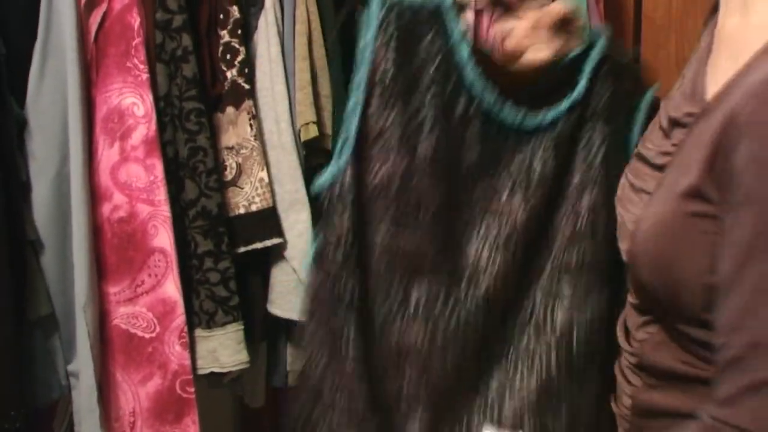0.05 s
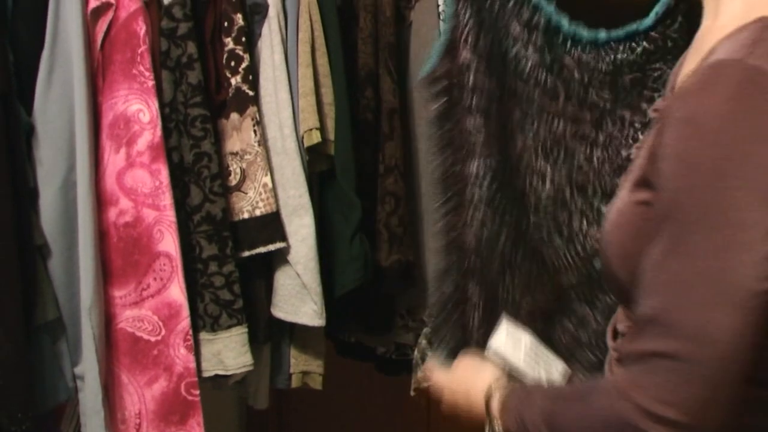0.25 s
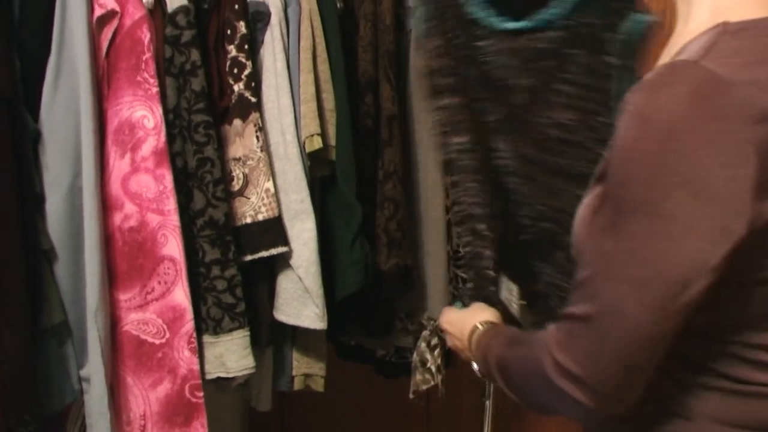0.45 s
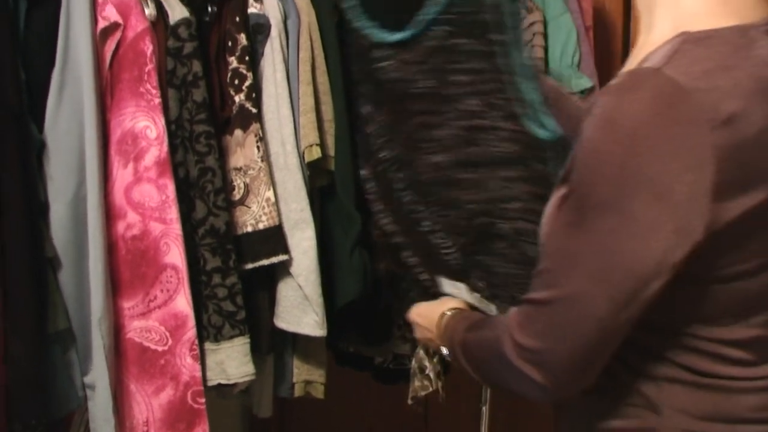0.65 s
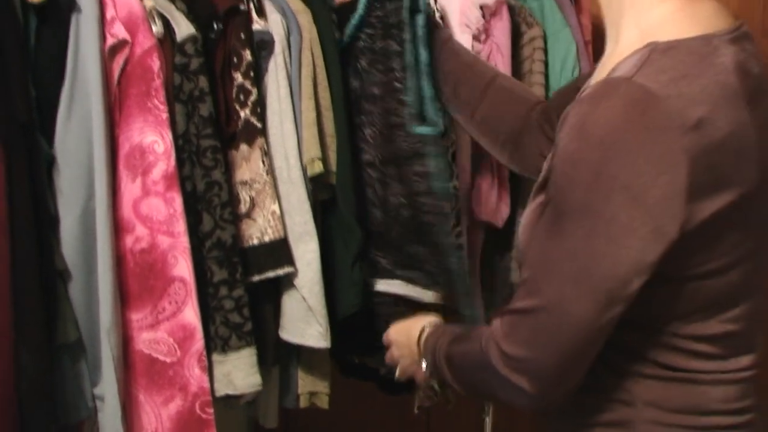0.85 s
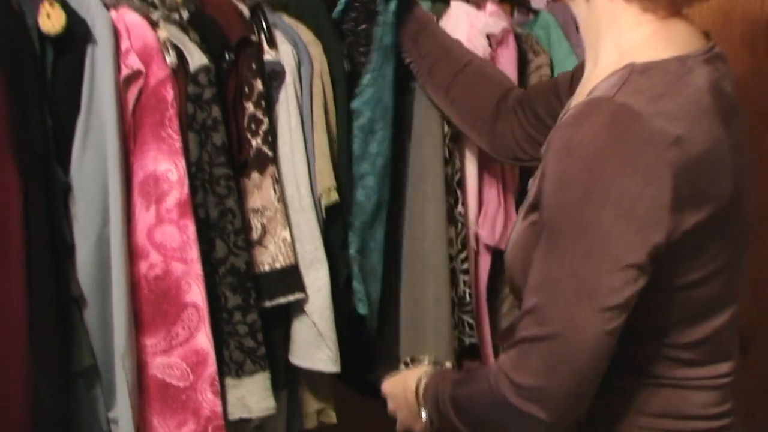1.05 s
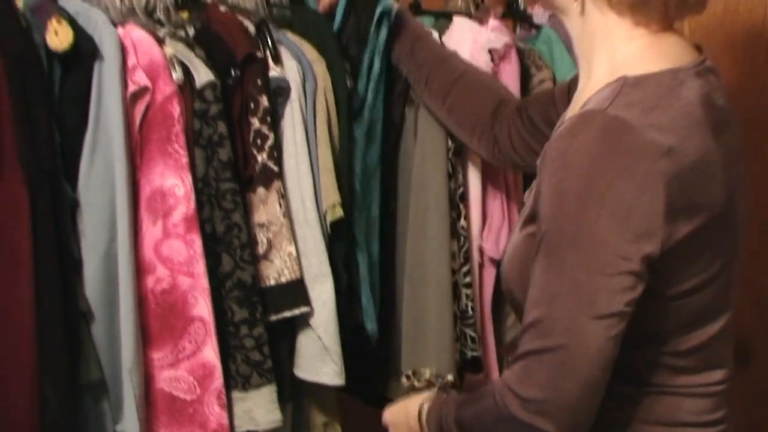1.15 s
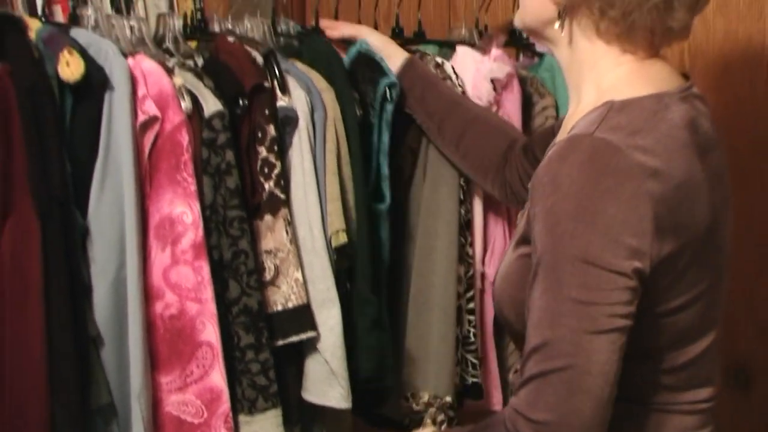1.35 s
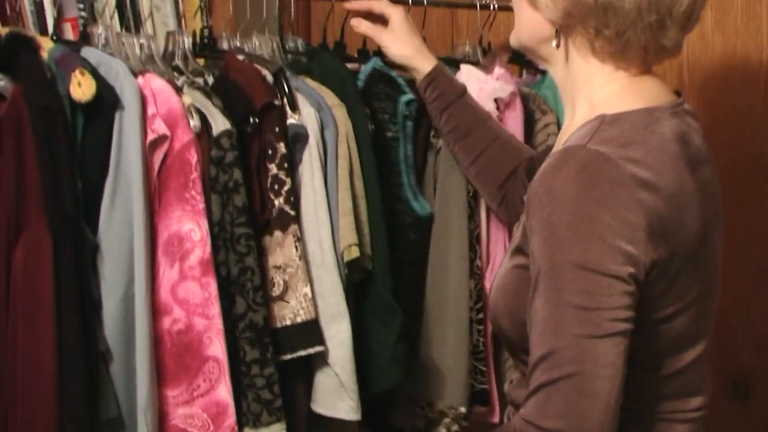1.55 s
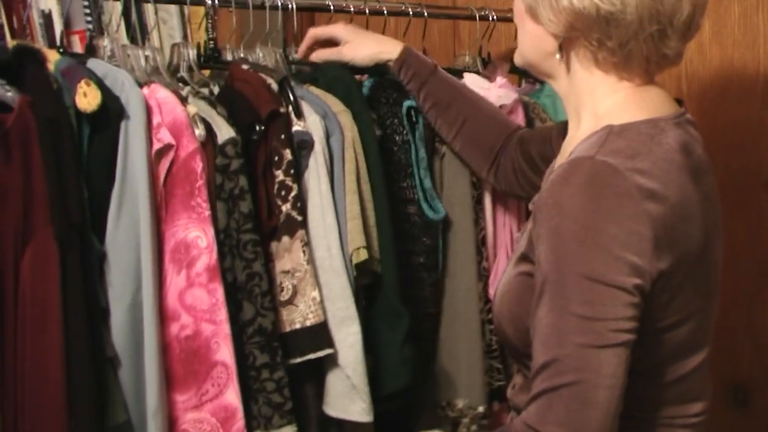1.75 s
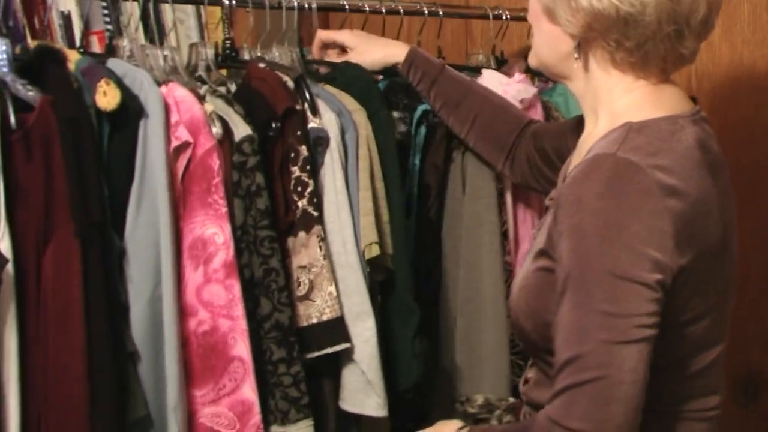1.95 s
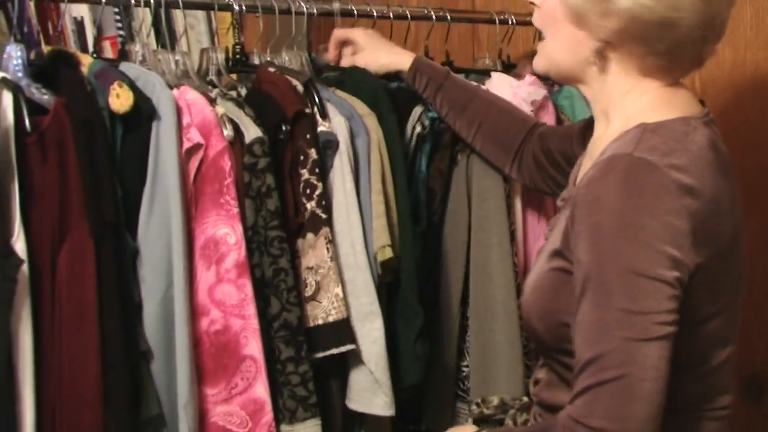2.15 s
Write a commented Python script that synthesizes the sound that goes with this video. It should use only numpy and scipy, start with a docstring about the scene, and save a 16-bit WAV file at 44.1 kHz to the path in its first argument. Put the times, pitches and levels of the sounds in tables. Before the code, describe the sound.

A wire hanger hook clacks sharply onto a metal rail, then a neighbouring hanger clinks

```python
"""A wire-hooked hanger is hung on the metal rail of a crowded clothes rack in a small panelled room:
the hook strikes the rail, a neighbour clinks (noise cracks plus bunches of decaying sines), and the
rack hums briefly (low modes that swell). A soft thud, small plastic taps and dry ticks (shaped noise
puffs), cloth rustle and the room's hiss (patchy stereo noise) complete the scene."""
import sys
import numpy as np
from scipy import signal
from scipy.fft import rfft, irfft, next_fast_len
from scipy.io import wavfile
from scipy.ndimage import uniform_filter1d

SR = 44100
rng = np.random.default_rng(int(sys.argv[2]) if len(sys.argv) > 2 else 0)


def volts_from_decibels(level):
    """Turn decibel levels (scalar or array-like) into linear amplitude factors."""
    exponent = np.asarray(level, float) / 20
    return 10 ** exponent


def generate_wav(sig):
    """Save sig (samples, or channels by samples) to the path in sys.argv[1] as 16-bit PCM at SR."""
    pcm = np.round(np.clip(np.atleast_2d(sig).T, -1, 1) * 32767).astype(np.int16)
    wavfile.write(sys.argv[1], SR, pcm)


N = 97372

# hiss spectrum: f/Hz, relative density/dB
HISS_SPECTRUM = [(35, -41), (60, -10), (107, -9.5), (188, -8), (260, -4.5), (329, -6), (488, -6.5),
                 (815, -3), (959, -7.5), (1800, -4.5), (2020, -10.5), (2870, -8.5), (3370, -11),
                 (5010, -13), (15700, -21)]
# cloth rustle envelope: t/s, rms level/dB
RUSTLE_ENVELOPE = [(0, -90), (0.031, -58), (.09, -56.5), (.15, -71.5), (.33, -77), (.42, -61.5), (.5, -67),
                   (.62, -82), (.84, -73), (.87, -67.5), (.93, -64), (.97, -70), (1.04, -67), (1.15, -82),
                   (1.6, -93), (1.7, -70.5), (1.88, -63.5)]
# cloth spectrum: f/Hz, relative density/dB
CLOTH_SPECTRUM = [(150, -120), (300, 3.5), (800, -4.5), (2000, 1), (5000, -13.5), (10000, -10.5),
                  (16000, -21), (17000, -120)]
# likeness of the noise in left and right: f/Hz, correlation/1
NOISE_LIKENESS = [(60, 0.46), (180, -0.31), (550, -0.17), (1650, 0.017), (4970, 0.1), (15000, 0.11)]
# plastic taps: t/s, dry peak level/dB, centre f/Hz, width/Hz, t60/s
PLASTIC_TAPS = [(0.174, -53, 5000, 5900, 0.012), (0.8517, -45.5, 9000, 12000, 0.0023),
                (.896, -46, 6700, 12300, 0.026), (.896, -59, 805, 300, 0.014),
                (1.654, -44, 7700, 9000, 0.048), (1.657, -57.5, 2100, 381, 0.018),
                (1.7279, -39.5, 3640, 1210, 0.034), (1.739, -51, 1510, 533, 0.044),
                (1.798, -56.5, 7600, 900, 0.045), (1.798, -47.5, 3480, 2500, 0.2),
                (1.8466, -39.5, 8300, 12900, 0.018)]
# thud spectrum: f/Hz, relative density/dB
THUD_SPECTRUM = [(60, -40), (130, -9), (230, -1), (450, -3), (700, 0), (1200, -4), (2000, -7), (2900, -7),
                 (3800, -19), (12000, -27), (16000, -40)]
# dry ticks close by: t/s, dry peak level/dB, centre f/Hz, width/Hz
DRY_TICKS = [(.2385, -35, 1300, 4000), (.5367, -39, 3300, 4500), (.5408, -39, 3300, 3500),
             (1.2327, -15, 6000, 9000), (1.2455, -17, 5000, 8000), (1.7355, -38, 6000, 12000)]
# hook on rail, with its rattles: t/s, crack peak level before the wire's high-pass/dB
HOOK_CONTACTS = [(1.2303, -21), (1.2328, -18.5), (1.2372, -18), (1.2455, -24.5)]
# hook wire modes: f/Hz, relative level/dB, t60/s
HOOK_MODES = [(2100, -31, 0.15), (2716, -18, 0.076), (3650, -27, .05), (4130, -8, 0.25),
              (4740, -6.5, 0.062), (5220, -4, .06), (6780, 0.5, 0.045), (7240, -11.5, 0.32),
              (7560, -30, .08), (9600, -27, 0.04), (12400, -18, 0.072), (12400, 0, 0.041), (12500, -9, .06),
              (15700, -2, .05)]
# hook crack spectrum: f/Hz, relative density/dB
HOOK_CRACK_SPECTRUM = [(180, -81), (300, -26), (627, 4.5), (1130, -20.5), (3030, 0), (3590, 3.5),
                       (13000, 5.5), (15700, -21), (16500, -34)]
# rack frame modes: f/Hz, level/dB, t60/s
RACK_MODES = [(182.5, -52.5, 0.13), (430.5, -44, 0.18), (670, -54, 0.042), (760, -31.5, 0.077),
              (1160, -65, 0.04)]
# neighbouring hanger's contacts: t/s, crack peak level before the wire's high-pass/dB
CLINK_CONTACTS = [(1.3506, -22), (1.3533, -22.5), (1.366, -30)]
# neighbour's modes: f/Hz, relative level/dB, t60/s
NEIGHBOUR_MODES = [(730, -22, 0.12), (2225, -21.5, 0.096), (2886, -2.5, 0.035), (3560, -8.5, 0.14),
                   (4250, -5.5, 0.24), (5123, -10.5, 0.23), (6220, -6.5, .1), (7430, -9.5, 0.14),
                   (9065, -11.5, 0.16), (9970, -11, 0.061), (11880, 5, 0.083), (13700, -5, 0.078),
                   (13700, -28, .03), (15400, -11, 0.046)]
# clink crack spectrum: f/Hz, relative density/dB
CLINK_CRACK_SPECTRUM = [(300, -40), (550, -36), (700, -30), (1600, -29), (2700, -7), (4240, 12), (8000, 5),
                        (12000, 3), (14000, -7), (16500, -6)]
# neighbour's lines that outlast the clatter: f/Hz, level/dB, t60/s
LONG_RING_MODES = [(4250, -46, .6), (4228, -51, .6), (4300, -48, .35), (2690, -49, .4), (5050, -48, .3),
                   (6250, -48, .3)]
# room decay: f/Hz, t60/s
ROOM_DECAY = [(150, 0.37), (1000, 0.32), (3000, 0.21), (8000, 0.21), (16000, 0.16)]
# likeness of the room's answer in left and right: f/Hz, correlation/1
ROOM_LIKENESS = [(200, 1), (1000, .5), (2500, 0.87), (5000, 0.12), (15000, 0.16)]
# recording band, bass thinned and top cut: f/Hz, gain/dB
RECORDING_RESPONSE = [(20, -30), (60, -12), (110, 0), (15900, 0), (15960, -20), (17000, -30)]

HISS_RMS_DB, RUSTLE_FADE_START_S, RUSTLE_FADE_DB_PER_S = -58.5, 1.92, 300
TAP_MAX_ATTACK_S = 0.0005
THUD_S, THUD_PEAK_DB, THUD_T60_S, THUD_ATTACK_S, THUD_ROOM_DB = 0.230, -35, 0.15, 0.0015, -4.5
TICK_T60_S, TICK_ATTACK_S, TICK_ROOM_DB = 0.0016, 0.0001, 0
HOOK_RING_DB, CLINK_RING_DB, MODE_SCATTER_DB = -17, -16, 3.5
HOOK_SPREAD, CLINK_SPREAD, RACK_SPREAD = 0.03, 0.024, 0.03  # relative sd of partial frequency
CRACK_T60_S, CRACK_ATTACK_S, WIRE_LOW_HZ = 0.019, 0.00011, 457
RACK_SWELL_S, LONG_RING_ATTACK_S = 0.021, 0.0011
ROOM_DB, FIRST_WALL_S = 4, 0.00067
T = np.arange(SR // 2) / SR  # time axis of one event, s


def unit(x):
    """Scale to rms 1."""
    return x / np.sqrt(np.mean(x ** 2) + 1e-20)


def along(points, hz):
    """Interpolate (f/Hz, value) points on a log axis."""
    f, value = np.transpose(points)
    return np.interp(np.log(hz + 1), np.log(f + 1), value)


def filtered(x, response):
    """Multiply the spectrum of x by a response of frequency."""
    n = x.shape[-1]
    m = 2 * next_fast_len(n // 2 + 4096)
    spectrum = rfft(x, m) * response(np.fft.rfftfreq(m, 1 / SR))
    return irfft(spectrum, m)[..., :n]


def causal(db):
    """Minimum-phase response of these levels: it starts no earlier than its cause."""
    cepstrum = irfft(np.log(volts_from_decibels(np.maximum(db, -90))))
    half = len(cepstrum) // 2
    cepstrum[1:half] *= 2
    cepstrum[half + 1:] = 0
    return np.exp(rfft(cepstrum))


def shaped(points):
    """Causal response through (f/Hz, level/dB) points."""
    return lambda hz: causal(along(points, hz))


def resonance(centre_hz, width_hz):
    """Two equal band-pass resonators in series."""
    def response(f):
        damping = 1j * f * width_hz
        return (damping / (centre_hz ** 2 - f ** 2 + damping)) ** 2
    return response


def widened(pair, likeness):
    """Mix two unrelated noises to a left and right of given correlation."""
    def mid_side_gains(hz):
        angle = np.arccos(np.clip(along(likeness, hz), -1, 1)) / 2
        return np.array([np.cos(angle), np.sin(angle)])
    mid, side = filtered(pair, mid_side_gains)
    return np.array([mid + side, mid - side])


def rush(spectrum, patchy_db):
    """Stereo noise of rms 1 with time-frequency patches of random gain."""
    z = signal.stft(rng.standard_normal((2, N)), nperseg=512)[2]
    field = rng.standard_normal(z.shape[1:])
    field = uniform_filter1d(field, size=6, axis=0)
    field = uniform_filter1d(field, size=8, axis=1)
    pair = signal.istft(z * volts_from_decibels(patchy_db * unit(field)), nperseg=512)[1][:, :N]
    return unit(filtered(widened(pair, NOISE_LIKENESS), lambda hz: volts_from_decibels(along(spectrum, hz))))


def burst(response, t60_s, attack_s):
    """Decaying noise puff through a response, scaled to peak 1."""
    envelope = volts_from_decibels(-60 * T / t60_s) * (1 - np.exp(-T / attack_s))
    sound = filtered(rng.standard_normal(len(T)) * envelope, response)
    return sound / np.abs(sound).max()


def ring(modes, spread=0, count=1):
    """Struck modes: each a bunch of decaying partials with random level and frequency offsets."""
    hz, db, t60_s = np.repeat(modes, count, axis=0).T[..., None]
    level_luck, pitch_luck = rng.standard_normal((2, len(hz), 1))
    envelope = volts_from_decibels(db + MODE_SCATTER_DB * level_luck - 60 * T / t60_s)
    partials = envelope * np.sin(2 * np.pi * hz * (1 + spread * pitch_luck) * T)
    return partials.sum(axis=0) / np.sqrt(count)


def add(out, start_s, sound, room_db=ROOM_DB):
    """Place a sound, centred, plus its convolution with a decaying stereo noise tail (the room)."""
    hz, t, z = signal.stft(rng.standard_normal((2, len(T))), SR, nperseg=256)
    decay = volts_from_decibels(-60 * t / along(ROOM_DECAY, hz)[:, None])
    pair = signal.istft(z * decay, SR, nperseg=256)[1][:, :len(T)]
    onset = 1 - np.exp(-T / FIRST_WALL_S)
    tail = widened(pair, ROOM_LIKENESS) * onset / np.linalg.norm(pair[0])
    heard = volts_from_decibels(room_db) * signal.fftconvolve(sound[None], tail, axes=1)
    heard[:, :len(sound)] += sound
    out[:, round(start_s * SR):][:, :heard.shape[1]] += heard


def silence():
    """Empty stereo track with space for tails past the end."""
    return np.zeros((2, N + 2 * SR))


def hiss():
    """Room hiss: steady noise with mildly patchy gain."""
    return volts_from_decibels(HISS_RMS_DB) * rush(HISS_SPECTRUM, patchy_db=1.6)


def cloth():
    """Garments brushing each other: noise under a level envelope, faded out quickly after 1.92 s."""
    s, db = np.transpose(RUSTLE_ENVELOPE)
    t = np.arange(N) / SR
    fade_db = RUSTLE_FADE_DB_PER_S * np.maximum(t - RUSTLE_FADE_START_S, 0)
    return volts_from_decibels(np.interp(t, s, db) - fade_db) * rush(CLOTH_SPECTRUM, patchy_db=2.5)


def taps():
    """Small plastic taps: each a short noise puff in one resonance."""
    out = silence()
    for s, db, centre_hz, width_hz, t60_s in PLASTIC_TAPS:
        attack_s = min(TAP_MAX_ATTACK_S, t60_s / 10)
        add(out, s, volts_from_decibels(db) * burst(resonance(centre_hz, width_hz), t60_s, attack_s))
    return out[:, :N]


def thud():
    """Soft thud: one noise puff, strongest in the low mids."""
    out = silence()
    puff = burst(shaped(THUD_SPECTRUM), THUD_T60_S, THUD_ATTACK_S)
    add(out, THUD_S, volts_from_decibels(THUD_PEAK_DB) * puff, THUD_ROOM_DB)
    return out[:, :N]


def ticks():
    """Dry ticks close by: very short resonant puffs with less room."""
    out = silence()
    for s, db, centre_hz, width_hz in DRY_TICKS:
        puff = burst(resonance(centre_hz, width_hz), TICK_T60_S, TICK_ATTACK_S)
        add(out, s, volts_from_decibels(db) * puff, TICK_ROOM_DB)
    return out[:, :N]


def wire_contacts(contacts, modes, spread, crack_spectrum, ring_db):
    """Each contact cracks and rings the wire; a third-order high-pass thins the bass."""
    out = silence()
    for s, db in contacts:
        crack = burst(shaped(crack_spectrum), CRACK_T60_S, CRACK_ATTACK_S)
        struck = crack + volts_from_decibels(ring_db) * ring(modes, spread, count=8)
        thin = filtered(struck, lambda f: (1j * f / (WIRE_LOW_HZ + 1j * f)) ** 3)
        add(out, s, volts_from_decibels(db) * thin)
    return out[:, :N]


def hook():
    """The wire hook strikes the rail and rattles."""
    return wire_contacts(HOOK_CONTACTS, HOOK_MODES, HOOK_SPREAD, HOOK_CRACK_SPECTRUM, HOOK_RING_DB)


def rack():
    """The first hook contact shakes the rack's frame: low modes swell, then decay."""
    out = silence()
    swell = 1 - np.exp(-(T / RACK_SWELL_S) ** 2)
    add(out, HOOK_CONTACTS[0][0], ring(RACK_MODES, RACK_SPREAD, count=3) * swell)
    return out[:, :N]


def neighbour():
    """The neighbouring hanger clinks; a few of its lines ring on, without room."""
    out = wire_contacts(CLINK_CONTACTS, NEIGHBOUR_MODES, CLINK_SPREAD, CLINK_CRACK_SPECTRUM, CLINK_RING_DB)
    long_ring = ring(LONG_RING_MODES) * (1 - np.exp(-T / LONG_RING_ATTACK_S))
    rest = out[:, round(CLINK_CONTACTS[0][0] * SR):][:, :len(T)]
    rest += long_ring[:rest.shape[1]]
    return out


def scene():
    """Sum of all sources."""
    return hiss() + cloth() + taps() + thud() + ticks() + hook() + rack() + neighbour()


def low_pass(x):
    """Removes everything above the highest recorded frequency."""
    return signal.sosfilt(signal.butter(12, 17060, fs=SR, output="sos"), x)


def record(dry):
    """Recording band: deep bass thinned, as by a microphone; steep top cut near 15.9 kHz."""
    mix = filtered(dry, shaped(RECORDING_RESPONSE))
    return low_pass(mix)


dry = scene()
out = record(dry)
generate_wav(out)
```